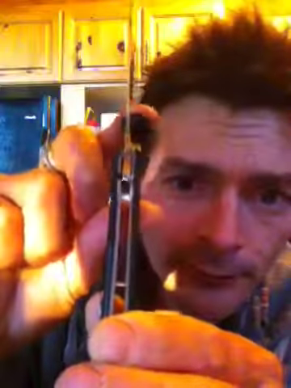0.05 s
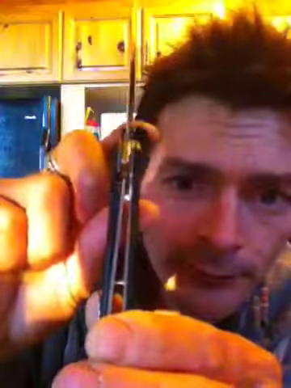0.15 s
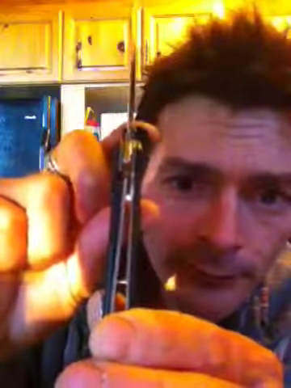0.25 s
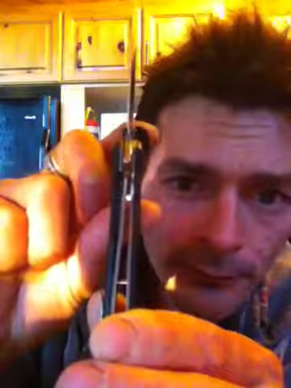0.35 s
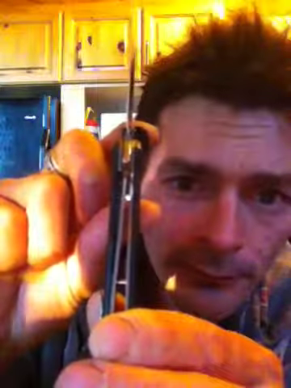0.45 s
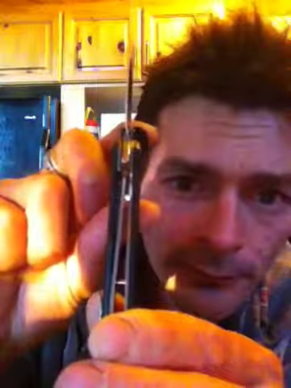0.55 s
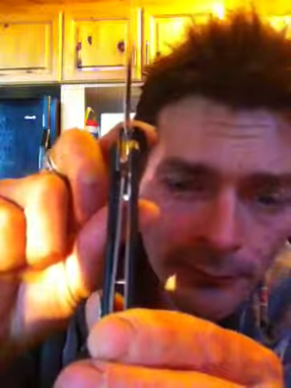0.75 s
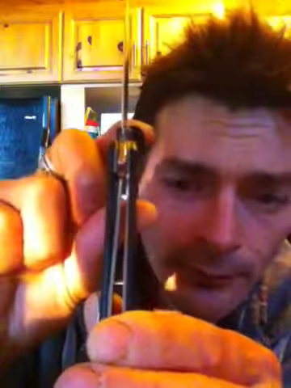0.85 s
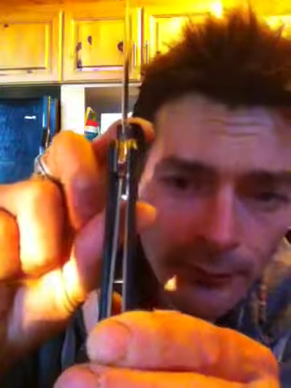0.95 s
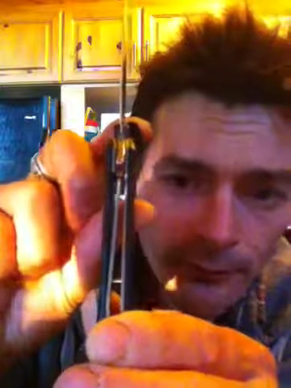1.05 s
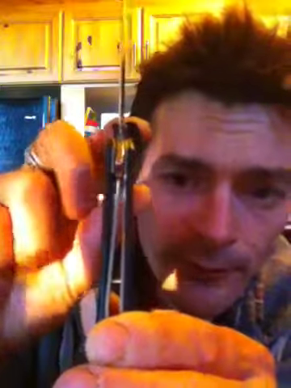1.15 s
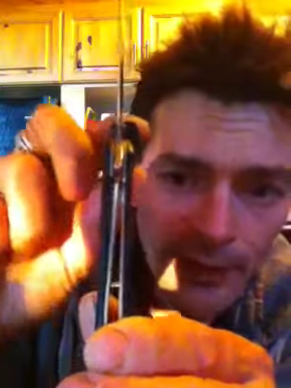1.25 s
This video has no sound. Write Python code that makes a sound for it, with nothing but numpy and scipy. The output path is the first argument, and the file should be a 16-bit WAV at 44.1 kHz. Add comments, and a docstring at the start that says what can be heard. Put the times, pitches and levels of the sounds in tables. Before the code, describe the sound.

One crisp, close snap of a folding knife's lock over a low appliance hum.

```python
"""A low appliance hum in a small quiet kitchen; then, close to the microphone, a folding knife
ticks lightly and its lock snaps home. Each click is a crack of tiny contacts that sets the steel
ringing for a few milliseconds, and the room answers. A second later fingers shift and the lock is
touched again. The recorder turns its gain down after the loud snap and lets it creep back."""
import sys
import numpy as np
from scipy import signal
from scipy.fft import rfft, irfft
from scipy.io import wavfile

SR = 44100
rng = np.random.default_rng(int(sys.argv[2]) if len(sys.argv) > 2 else 0)


def to_wav(s):
    """Save 16-bit WAV."""
    ch = np.atleast_2d(s).T  # columns
    pcm = np.round(np.clip(ch, -1, 1) * 32767)  # PCM
    wavfile.write(sys.argv[1], SR, pcm.astype(np.int16))


N = 57330
TIME = np.arange(N) / SR


def from_db(db):
    """Decibels to gain."""
    return 10 ** (np.asarray(db) / 20)


def at_hz(points, hz):
    """Read a table on a log-frequency axis."""
    frequencies, values = np.transpose(points)
    return np.interp(np.log(hz), np.log(frequencies), values)


def one_pole(x, seconds):
    """Smooth with a time constant."""
    r = np.exp(-1 / (seconds * SR))
    return signal.lfilter([1 - r], [1, -r], x)


def band_pass(x, band_hz):
    """Keep the band between two frequencies."""
    return signal.sosfilt(signal.butter(2, band_hz, "band", fs=SR, output="sos"), x)


def ring(strikes, hz, t60):
    """One mode: a unit strike starts a sine of height 1 that falls 60 dB in t60 seconds."""
    r, w = from_db(-60 / (t60 * SR)), 2 * np.pi * hz / SR
    return signal.lfilter([0, np.sin(w)], [1, -2 * r * np.cos(w), r * r], strikes + 1e-18)


def burst(start, length):
    """Envelope of a short contact: quick rise, rounded fall."""
    phase = np.clip((TIME - start) / length, 0, 1)
    return np.sin(np.pi * np.sqrt(phase))


# Still kitchen air around the microphone: (frequency [Hz], relative density [dB])
ROOM_TONE_SPECTRUM = [(25, -27), (55, -12), (85, -14.5), (111, -9.5), (200, -5), (600, -5), (1050, -8.5),
                      (1350, -16.5), (2400, -24.5), (5000, -28.5), (15400, -32.5), (16000, -67.5)]

def room_tone(level_db=-50.5):
    """The bed of the quiet room: steady noise, mostly lows and low mids."""
    hz = np.maximum(np.arange(N // 2 + 1) * SR / N, 1)
    noise = irfft(rfft(rng.standard_normal(N)) * from_db(at_hz(ROOM_TONE_SPECTRUM, hz)), N)
    return from_db(level_db) * noise / noise.std()


# The appliance in the background: (frequency [Hz], median rms level [dB])
HUM_PARTIALS = [(120, -63), (200, -70), (250, -68.5), (362, -65.5), (402, -68.5), (600, -64), (960, -67)]

def appliance_hum(waver_db=3.5):
    """Mains hum whose partials each waver in level."""
    hum = np.zeros(N)
    for hz, db in HUM_PARTIALS:
        waver = one_pole(one_pole(rng.standard_normal(2 * N), 0.011), 0.011)[N:]
        amplitude = np.sqrt(2) * from_db(db + waver_db * waver / waver.std())
        hum += amplitude * np.sin(2 * np.pi * (hz * TIME + rng.random()))
    return hum


# How long the small kitchen rings: (frequency [Hz], t60 [s])
KITCHEN_DECAY = [(1000, 0.24), (3600, .3), (7000, 0.21), (15000, 0.48)]
# Colour of its tail at the microphone: (frequency [Hz], relative level [dB])
KITCHEN_COLOUR = [(1500, -1), (2500, -0.5), (3600, -3.5), (5000, 2.5), (6500, 5), (9000, 1), (15000, -10)]

def kitchen_reverb(sound, tail_db=-33.5, onset_s=.0044, wall_db=-38, wall_s=.0118, smear_s=.002):
    """A smeared echo off a nearby wall and a diffuse tail that dies band by band."""
    t = np.arange(SR // 2) / SR
    edges_hz = 600 * 2 ** np.arange(0, 5, .5)
    white, tail = rng.standard_normal((2, len(t))), 0
    for k, (low, high) in enumerate(zip(edges_hz, np.append(edges_hz[1:], .45 * SR))):
        hz = np.sqrt(low * high)
        decay = from_db(at_hz(KITCHEN_COLOUR, hz) - 60 * t / at_hz(KITCHEN_DECAY, hz))
        tail += band_pass(white[k % 2], [low, high]) * decay
    tail *= from_db(tail_db) * (1 - np.exp(-t / onset_s))
    wall = from_db(wall_db) * np.exp(-((t - wall_s) / smear_s) ** 2) * white[0]
    return signal.fftconvolve(sound, tail + wall)[:N]


# Close up, the blade slides on to its stop; later a finger rubs: (time [s], length [s], level [dB])
SOFT_RUBS = [(0.177, 0.019, -50), (1.227, 0.026, -58)]
# Fingers shifting on the knife, faint even this near: (time [s], level [dB])
FINGER_TICKS = [(1.2433, -56), (1.2555, -56), (1.269, -57)]

def handling(tick_s=.0018):
    """Soft rubs and tiny ticks, each a burst of bright noise."""
    noise = band_pass(rng.standard_normal(N), [4000, 12000])
    rubs = sum(from_db(db) * burst(start, length) for start, length, db in SOFT_RUBS)
    ticks = sum(from_db(db) * burst(start, tick_s) for start, db in FINGER_TICKS)
    return noise * (rubs + ticks)


# Another part of the lock, just as close: (frequency [Hz], relative level [dB], t60 [s])
LOCK_MODES = [(4470, 0, 0.014), (7350, 2.5, 0.014), (10700, -3.5, 0.0056), (14600, -15, .005)]

def lock_touch(start_s=1.2965, length_s=.0071, scrape_db=-46):
    """A last short scrape on the lock excites a few bright modes."""
    scrape = from_db(scrape_db) * burst(start_s, length_s)
    return sum(from_db(db) * ring(scrape * rng.choice([-1, 1], N), hz, t60) for hz, db, t60 in LOCK_MODES)


# The strongest ring at the microphone, two close modes: (frequency [Hz], t60 [s])
STEEL_PAIR = [(3545, .0165), (3735, .0165)]
# Faint long rings of the blade, one per pitch in blade_hz: (level re blow [dB], t60 [s])
BLADE_RINGS = [(-42.5, 0.34), (-36.5, .3)]
# Other modes of knife and handle: (frequency [Hz], level re crack [dB], t60 [s])
BODY_MODES = [(630, -22.5, .014), (1119, -23, 0.011), (1820, -0.5, 0.014), (2626, -4.5, 0.0096),
              (4746, -1.5, 0.0099), (5870, -7, 0.0066), (6163, 4.5, .008), (7180, 0.5, 0.016),
              (8640, 2.5, 0.0036), (9875, -3.5, 0.011), (10550, -13, 0.0035), (11560, -11.5, .005),
              (13700, -15, .005), (15300, -34, .006)]
# The tick and the snap, right at the microphone:
# (time [s], blow level [dB], crack level [dB], crack length [s], crack towards the walls [dB])
LOCK_CLICKS = [(0.185, -22.5, -27.5, .001, -23), (0.2187, -1, -9.5, .0026, -5)]

def knife(contacts_per_s=20000, chatter_db=6, chatter_t60=.035, blow_lag_s=.00115, blade_hz=(3637, 6239)):
    """The lock cracks and the steel rings; returns the close sound and the sound sent to the walls."""
    blows, crack, wall_crack = np.zeros((3, N))
    for start, blow_db, crack_db, length, walls_db in LOCK_CLICKS:
        blows[int((start + blow_lag_s) * SR)] = from_db(blow_db)
        chatter = (TIME > start) * from_db(chatter_db - 60 * np.abs(TIME - start) / chatter_t60)
        crack += from_db(crack_db) * (burst(start, length) + chatter)
        wall_crack += from_db(walls_db) * burst(start, length)
    contacts = (rng.random(N) < contacts_per_s / SR) * rng.choice([-1, 1], N)
    crack, wall_crack = band_pass(contacts * [crack, wall_crack], [2938, 10100])
    # Struck in opposition, the pair swells before it dies.
    rings = ring(blows, *STEEL_PAIR[0]) - ring(blows, *STEEL_PAIR[1])
    starts, _, cracks_db, lengths, _ = np.transpose(LOCK_CLICKS)
    for hz, mode_db, t60 in BODY_MODES:
        strike_s = starts + lengths * rng.random(len(starts))
        strike_db = cracks_db + mode_db + rng.normal(0, 1.5, len(starts))
        strikes = np.zeros(N)
        strikes[(strike_s * SR).astype(int)] = from_db(strike_db)
        rings += ring(strikes, hz, t60)
    blade = sum(from_db(db) * ring(blows, hz, t60) for hz, (db, t60) in zip(blade_hz, BLADE_RINGS))
    close = rings + blade + from_db(-3) * crack
    to_walls = from_db(-12) * rings + wall_crack
    low_cut = signal.butter(3, 705.2, "high", fs=SR, output="sos")  # too small to radiate bass
    return signal.sosfilt(low_cut, [close, to_walls])


def scene():
    """One microphone: knife and fingers up close, the kitchen and its hum behind."""
    close, to_walls = knife()
    small_sounds = handling() + lock_touch()
    reverb = kitchen_reverb(to_walls + small_sounds)
    return (close + small_sounds + reverb + room_tone() + appliance_hum())[None]


def record(dry):
    """The recorder's gain control follows the held peak level; peaks are rounded, the top treble is cut."""
    knee_db, reduction_db_per_db, release_db_per_s, attack_s = -43.5, 0.15, 23.5, 0.015
    ceiling, cutoff_hz = 1.4, 16950
    level_db = 10 * np.log10(one_pole(dry[0] ** 2, 0.0044) + 1e-12)
    release_db = release_db_per_s * TIME
    held_db = np.maximum.accumulate(level_db + release_db) - release_db
    gain_db = one_pole(-reduction_db_per_db * np.maximum(held_db - knee_db, 0), attack_s)
    rounded = ceiling * np.tanh(dry * from_db(gain_db) / ceiling)
    return signal.sosfilt(signal.cheby2(12, 70, cutoff_hz, fs=SR, output="sos"), rounded)


dry = scene()
out = record(dry)
to_wav(out)
```